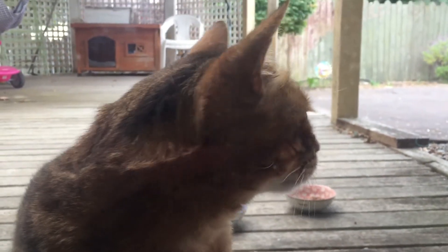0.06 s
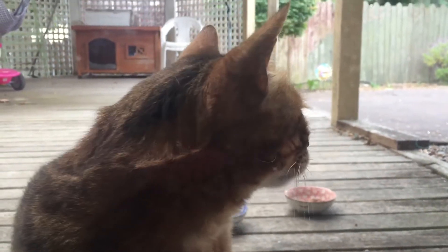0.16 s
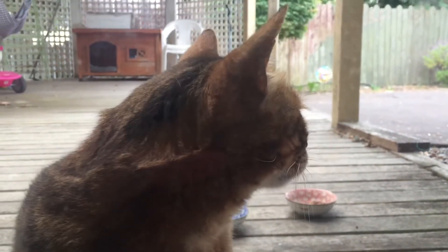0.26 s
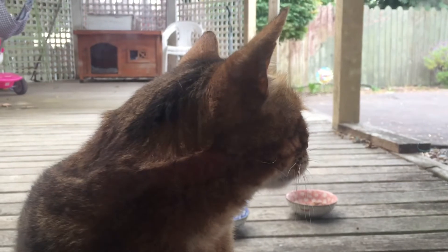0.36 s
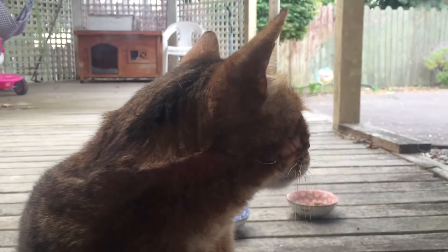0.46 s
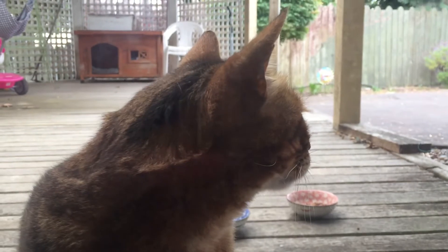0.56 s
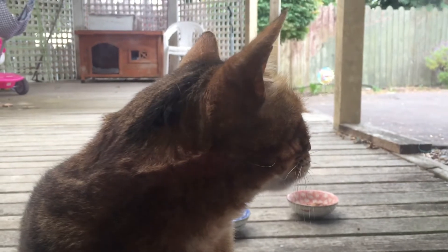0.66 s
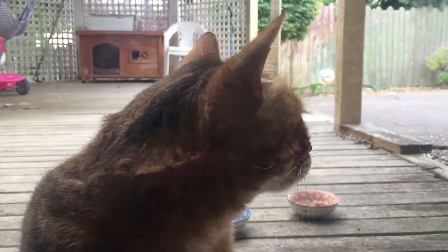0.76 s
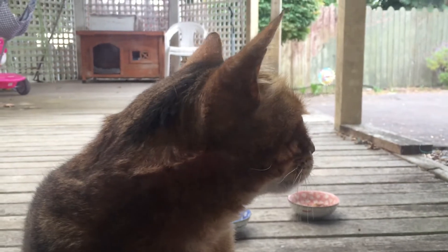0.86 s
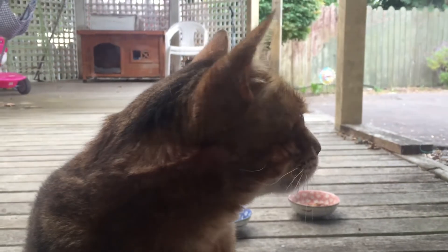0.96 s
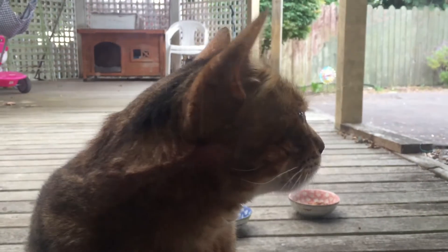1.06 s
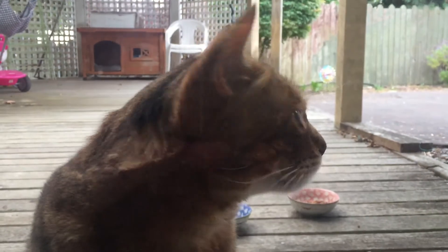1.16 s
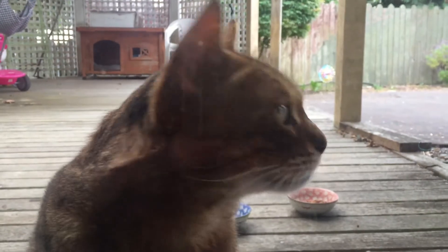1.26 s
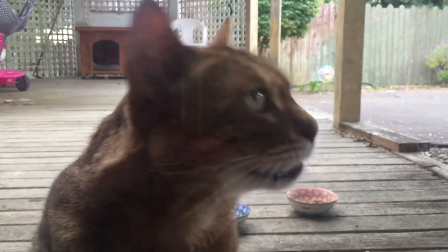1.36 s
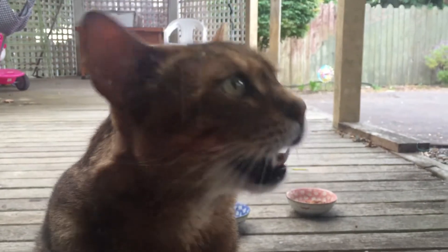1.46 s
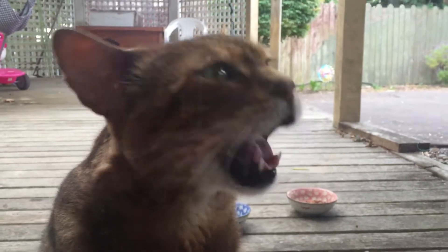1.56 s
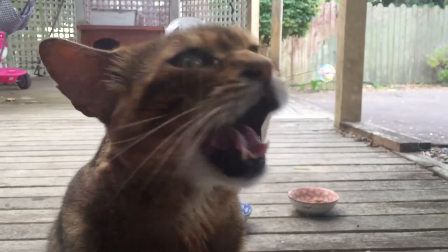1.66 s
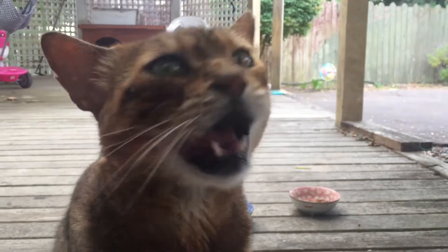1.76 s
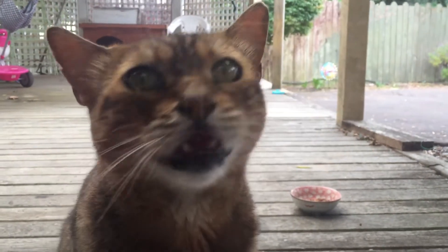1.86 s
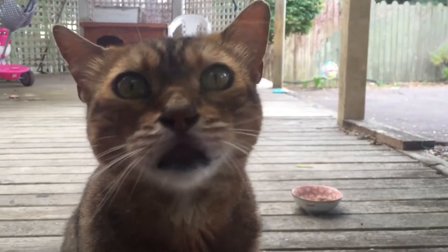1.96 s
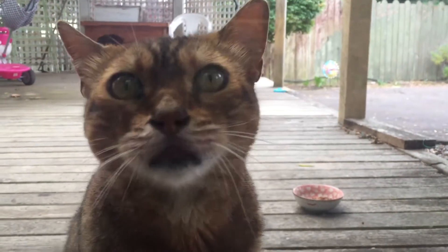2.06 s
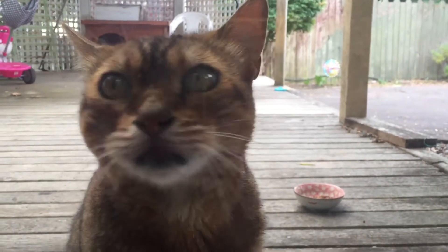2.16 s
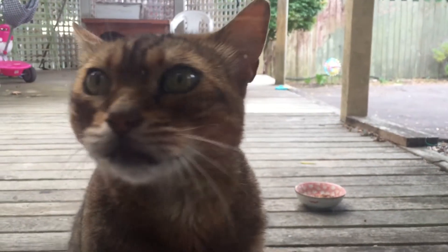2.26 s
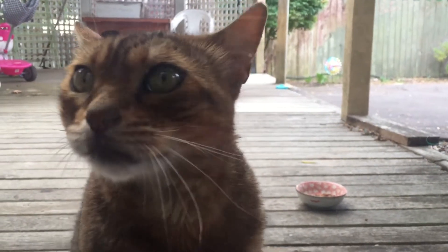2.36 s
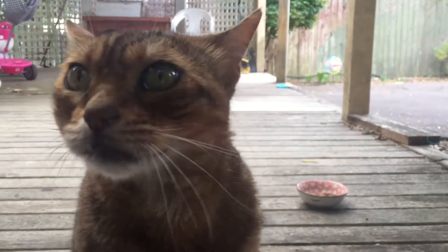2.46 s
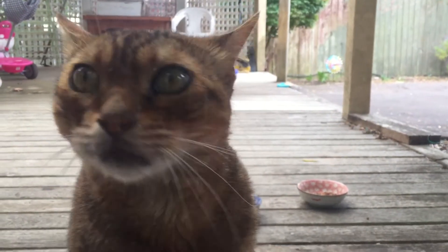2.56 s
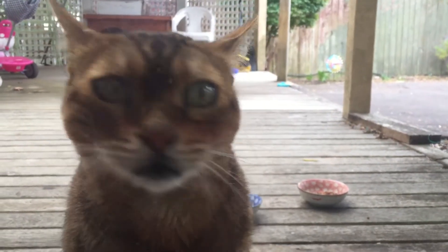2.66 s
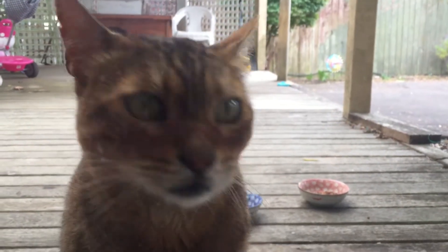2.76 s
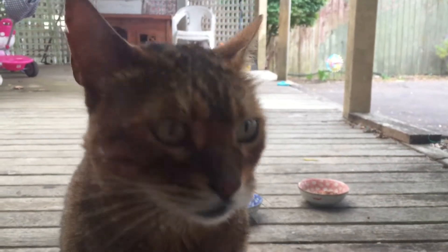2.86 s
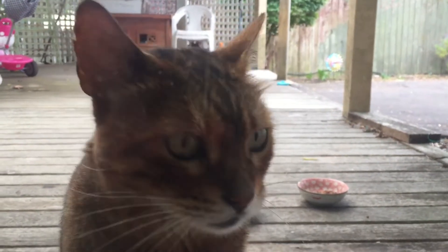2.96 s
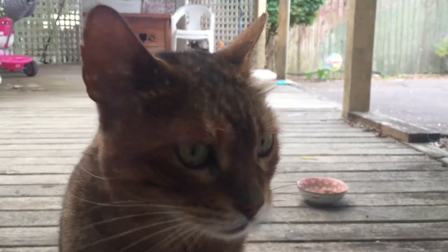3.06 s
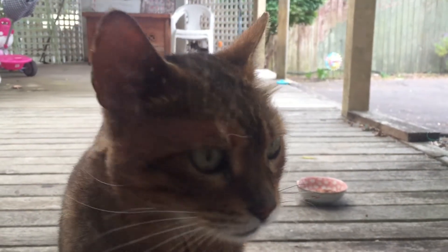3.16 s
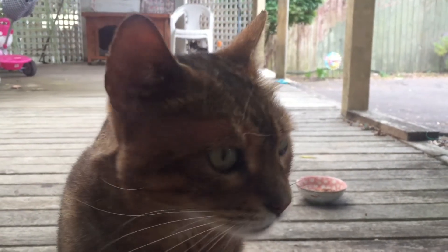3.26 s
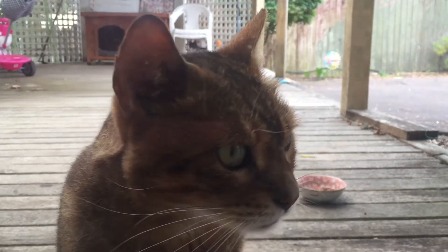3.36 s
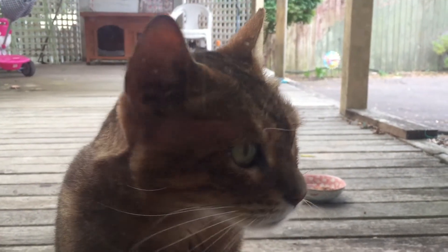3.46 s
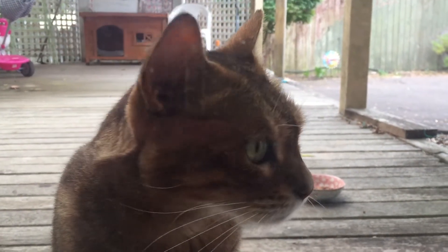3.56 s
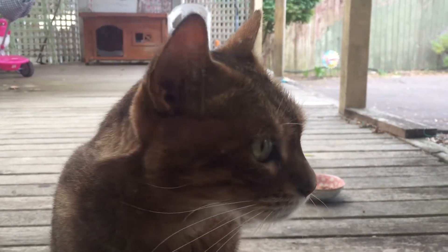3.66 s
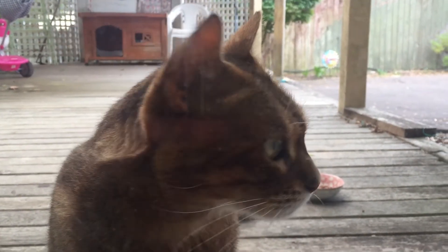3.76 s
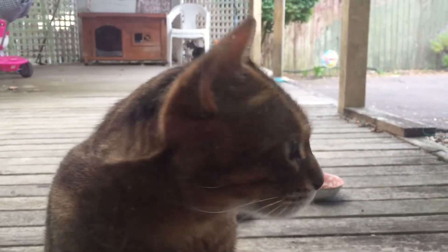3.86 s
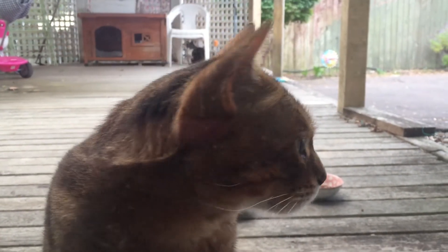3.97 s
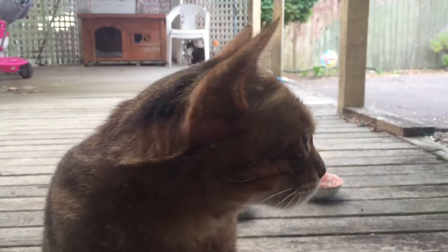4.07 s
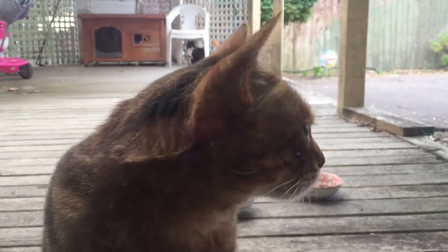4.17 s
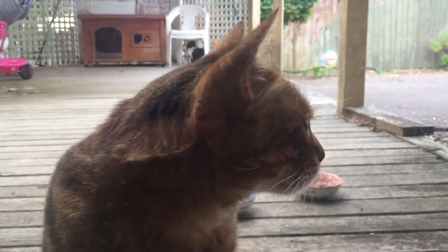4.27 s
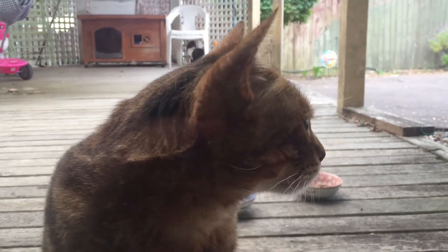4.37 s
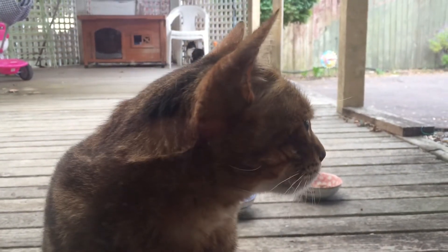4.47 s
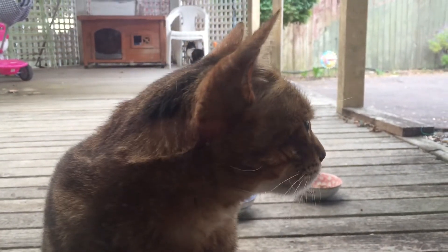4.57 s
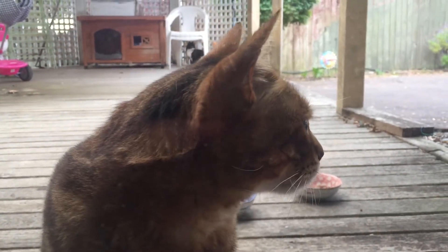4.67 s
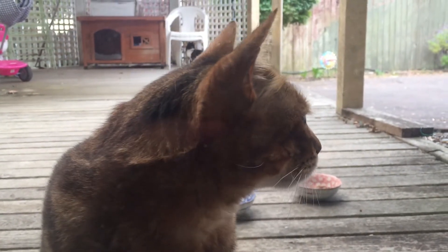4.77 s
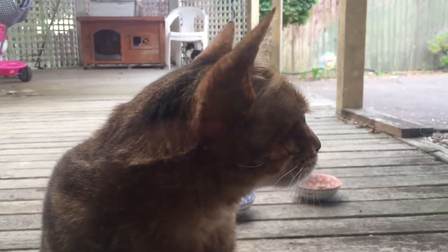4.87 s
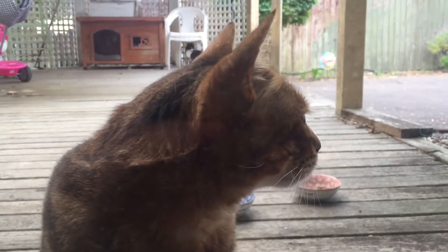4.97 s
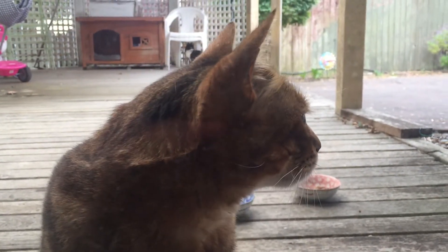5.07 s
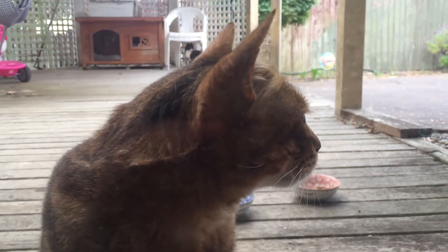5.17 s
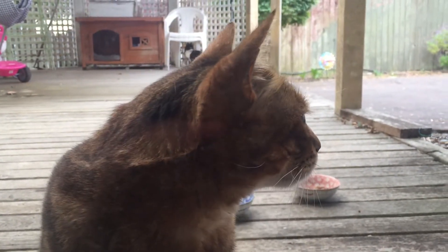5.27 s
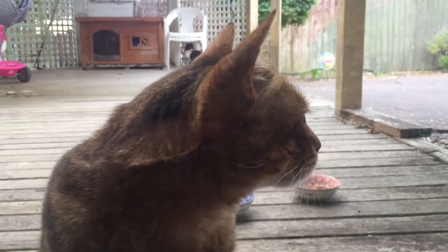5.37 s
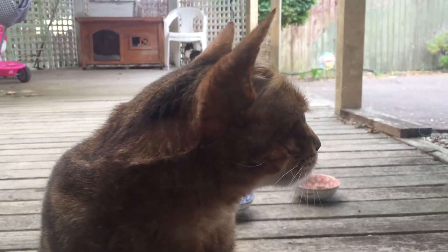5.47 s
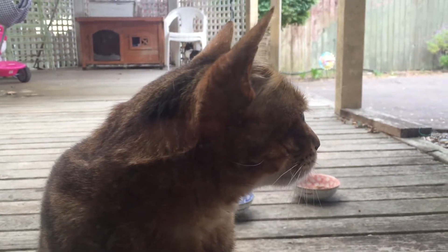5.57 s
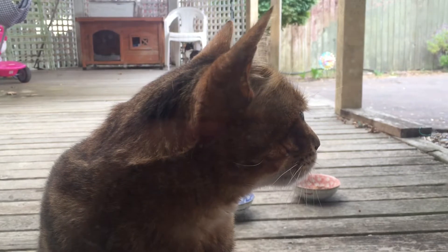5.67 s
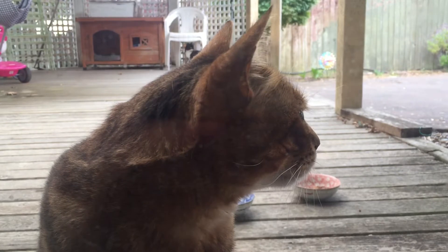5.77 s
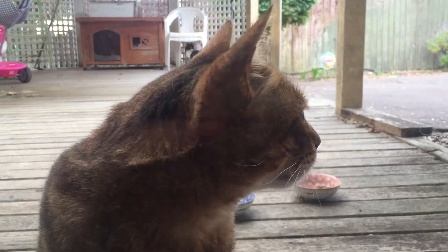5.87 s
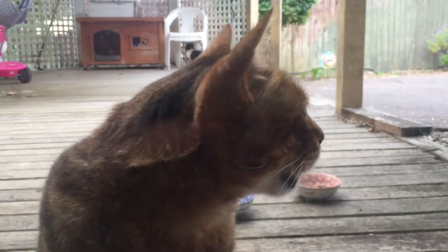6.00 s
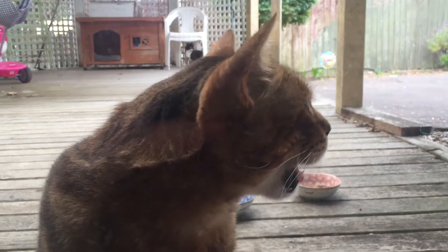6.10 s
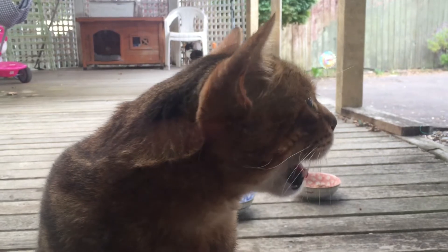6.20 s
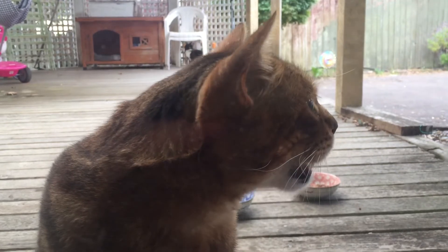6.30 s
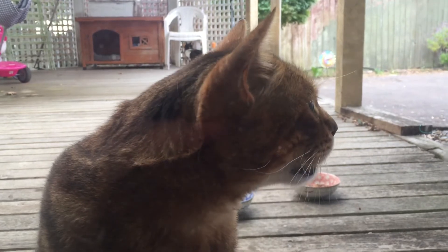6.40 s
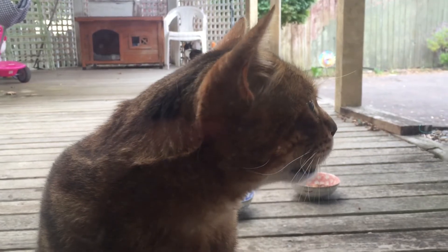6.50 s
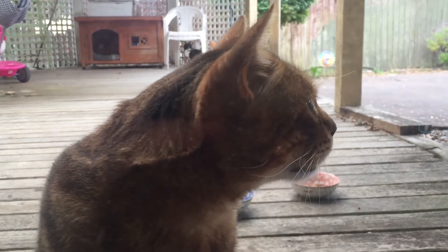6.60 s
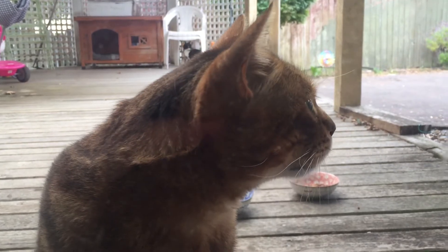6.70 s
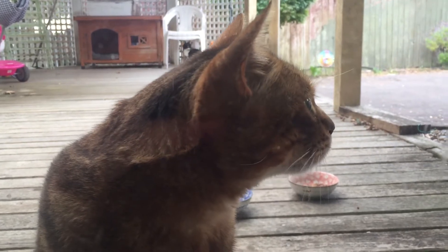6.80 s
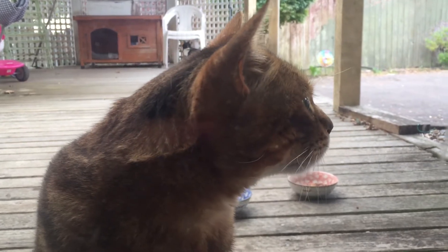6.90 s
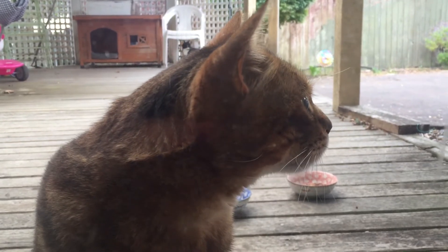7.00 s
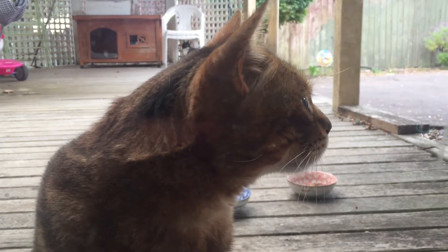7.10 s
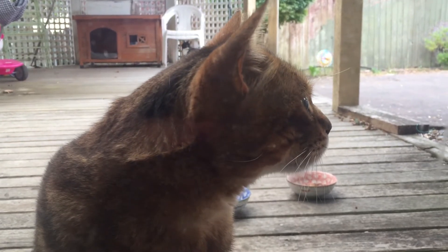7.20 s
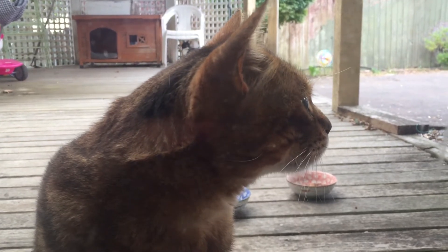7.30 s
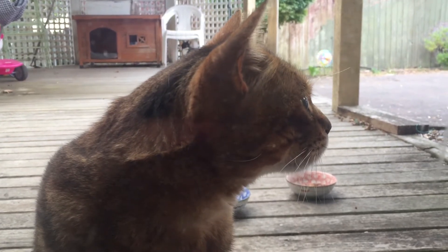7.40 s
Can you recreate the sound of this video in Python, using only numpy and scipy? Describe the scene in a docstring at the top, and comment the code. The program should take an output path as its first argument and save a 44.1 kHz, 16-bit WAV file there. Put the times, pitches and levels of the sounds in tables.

```python
"""Quiet air and microphone hiss lie over a roofed wooden deck. A small tap sounds, then a far engine hums.
A cat meows at 1.5 s: its pitch rises and falls while its mouth opens and closes.
A soft scuff and another tap follow, and the engine swells once more.
Around 4 s a door is knocked twice; its panel booms, shudders and rattles in the frame.
At 6.1 s the cat meows again."""
import sys
import numpy as np
from scipy import signal
from scipy.fft import rfft, irfft, next_fast_len
from scipy.io import wavfile
from scipy.ndimage import uniform_filter1d

SR = 44100
rng = np.random.default_rng(int(sys.argv[2]) if len(sys.argv) > 2 else 0)


def dump(signal):
    """Clip the signal to [-1, 1] and save it as 16-bit WAV at the path in sys.argv[1]."""
    limited = np.clip(np.atleast_2d(signal).T, -1, 1)
    pcm = np.round(limited * 32767).astype(np.int16)
    wavfile.write(sys.argv[1], SR, pcm)


N = 328184
TIME = np.arange(N) / SR


def undb(db):
    """Turn decibels into a gain to multiply by."""
    return 10 ** (np.asarray(db) / 20)


def unit(x):
    """Scale a signal so that its average size (rms) is 1."""
    return x / np.sqrt(np.mean(x ** 2))


def swell(times, db):
    """A gain that follows a curve in decibels and is silent just outside it."""
    edge = np.interp(TIME, [times[0] - .01, times[0], times[-1], times[-1] + .01], [0, 1, 1, 0])
    return edge * undb(np.interp(TIME, times, db))


def envelope(start, length, attack_s, release_s):
    """Fade in smoothly, hold, and fade out."""
    rise = np.clip((TIME - start) / attack_s, 0, 1)
    fall = np.clip((start + length - TIME) / release_s, 0, 1)
    return (np.sin(np.pi / 2 * rise) * np.sin(np.pi / 2 * fall)) ** 2


def wobble(rate):
    """A random drift of size 1 that heads for a new value `rate` times a second."""
    hold = max(int(SR / rate), 1)
    steps = np.repeat(rng.standard_normal(N // hold + 1), hold)
    return unit(uniform_filter1d(steps, hold)[:N])


def colour(x, points):
    """Shape bass and treble along (Hz, dB) points; the result has size 1."""
    hz, db = np.transpose(points)
    size = next_fast_len(N)
    bins = np.maximum(np.fft.rfftfreq(size, 1 / SR), 1)
    gain = undb(np.interp(np.log(bins), np.log(hz), db))
    return unit(irfft(rfft(x, size) * gain, size)[:N])


def ring(x, hz, width):
    """A resonance: let through a band `width` Hz wide around one frequency."""
    return signal.lfilter(*signal.iirpeak(hz, hz / width, fs=SR), x)


def contacts(rate, scatter_db):
    """Tiny impacts of uneven size, about `rate` of them a second."""
    clicks = (rng.random(N) < rate / SR) * rng.standard_normal(N)
    return unit(clicks * undb(scatter_db * rng.standard_normal(N)))


def porch(x, wet_db, t60_s):
    """Boards, wall and roof add short, scattered echoes that fall by 60 dB in t60_s."""
    age = TIME[:SR // 2]
    tail = contacts(rate=2500, scatter_db=4.5)[:len(age)] * undb(-60 * age / t60_s) * (age > .003)
    return x + undb(wet_db) * signal.fftconvolve(x, tail / np.linalg.norm(tail))[:N]


def air():
    """Steady hiss over a low outdoor rumble that wavers."""
    # tone of the background: f/Hz, relative level/dB
    air_colour = [(15, -48), (25, -14), (42, -8.5), (91, 0), (122, -7), (152, -6.5), (253, -15.5),
                  (322, -16), (469, -20.5), (567, -20.5), (848, -22.5), (1450, -24.5), (1570, -23),
                  (6380, -30.5), (15500, -38)]
    bed = colour(rng.standard_normal(N), air_colour)
    rumble = ring(bed, hz=95, width=110)
    waver = undb(1.1 * wobble(6.4)) - 1
    return undb(-66.5) * (bed + rumble * waver)


def engine():
    """Only the firing note of a far engine carries to the deck; it swells, glides and fades."""
    # swells of the hum: start/s, length/s, first firing rate/Hz, last firing rate/Hz, level/dB
    swells = [(.45, 0.42, 135, 136.6, -62), (0.865, 0.58, 143.7, 168.3, -60.5),
              (2.65, 0.47, 139.2, 135.6, -65)]
    out = np.zeros(N)
    for start, length, first_hz, last_hz, db in swells:
        hz = np.interp(TIME, [start, start + length], [first_hz, last_hz])
        note = np.sin(2 * np.pi * np.cumsum(hz) / SR)
        fade_s = 0.32 * length
        out += undb(db) * envelope(start, length, fade_s, fade_s) * note
    return out * undb(2.8 * wobble(37.15))


def taps():
    """Light touches on wood, each a single note that dies away: the wider its band, the sooner."""
    # touches: t/s, level/dB, f/Hz, width/Hz
    touches = [(.254, -56.5, 686, 70), (0.255, -52, 308, 110), (0.275, -55.5, 74.6, 8.9),
               (2.373, -58.5, 205, 22)]
    out = np.zeros(N)
    for start, db, hz, width in touches:
        age = np.maximum(TIME - start, 0)
        out += undb(db) * np.exp(-np.pi * width * age) * np.sin(2 * np.pi * hz * age)
    return out


def scuff():
    """A brief, dull rub made of small slips."""
    # tone of the rub: f/Hz, relative level/dB
    rub_colour = [(29, -32), (50, 5.5), (130, -7), (205, 3), (296, -24), (369, -14), (639, -2.5),
                  (797, -12), (906, 1), (1410, -11), (1630, -4), (2110, -27), (4000, -29), (5200, -61),
                  (8800, -120)]
    rub = undb(-57.5) * envelope(start=2.335, length=.15, attack_s=0.078, release_s=.04)
    return rub * colour(contacts(rate=825, scatter_db=-0.5), rub_colour)


def panel(age):
    """The door panel bends at three low notes at once, which beat against each other."""
    # bending notes: f/Hz, relative level/dB
    notes = [(55, -14.5), (84, 1.5), (113, -10.5)]
    return sum(undb(db) * np.sin(2 * np.pi * hz * age) for hz, db in notes)


def rattle(chatter, frame_hits):
    """The door chatters against its frame, and the hits set the wood ringing."""
    # resonances of door and frame: f/Hz, width/Hz, relative level/dB
    resonances = [(307.5, 13, 8), (726.6, 43, 4), (1025, 44, 0), (1629, 220, 9), (1764, 120, 2),
                  (1960, 130, 0.5), (2198, 29, -10), (2475, 120, -2), (2790, 51, -12), (2990, 190, -9.5),
                  (3270, 99, -10), (4170, 560, -11.5), (5500, 290, -20.5), (6790, 270, -22.5)]
    # tone of the chatter: f/Hz, relative level/dB
    chatter_colour = [(60, -6), (120, -6), (230, 0.5), (480, -3.5), (800, -6), (1200, -0.5), (1600, 1),
                      (2800, -5), (4300, -15), (4950, -18), (5800, -20.5), (7000, -28), (9000, -37.5),
                      (14000, -66)]
    wood = sum(undb(db) * ring(ring(frame_hits, hz, width), hz, width) for hz, width, db in resonances)
    clatter = colour(chatter, chatter_colour)
    return undb(-10.5) * np.std(frame_hits) * unit(wood) + undb(-5) * np.std(chatter) * clatter


def door(rise_s=0.015, boom_decay_s=0.046, shudder_attack_s=0.041, soft_hz=4300):
    """Each knock makes the panel boom, thud and rattle, then shudder to rest."""
    # knocks and rebounds: t/s, rattle/dB, boom/dB, thud/dB, rattle decay/s, ring relative to rattle/dB
    knocks = [(3.887, -37.5, -31.5, -45, 0.052, -2.5), (4.008, -50.5, -61, -56, 0.033, -8),
              (4.092, -51.5, -58, -58, 0.021, 2), (4.407, -30, -21, -48, 0.062, 2)]
    # shudder after each knock: start/s, length/s, boom/dB, rattle/dB
    shudders = [(3.98, 0.39, -44, -49), (4.515, .21, -39.5, -44.5)]
    boom, hard_gain, soft_gain, thud_gain, ring_gain = np.zeros((5, N))
    for start, rattle_db, boom_db, thud_db, decay_s, ring_db in knocks:
        age = np.maximum(TIME - start, 0)
        attack = 1 - np.exp(-(age / .011) ** 2)
        burst = attack * np.exp(-(age / decay_s) ** 2 / 2)
        hard_gain += undb(rattle_db) * burst
        ring_gain += undb(rattle_db + ring_db) * burst
        thud_gain += undb(thud_db) * burst
        age = np.maximum(TIME - start + 0.0077, 0)  # the panel bends before it meets the frame
        push = (1 - np.exp(-(age / rise_s) ** 2)) * np.exp(-(age / boom_decay_s) ** 1.6 / 2)
        boom -= undb(boom_db) * push * panel(age)
    for start, length, boom_db, rattle_db in shudders:
        age = TIME - start
        attack = np.clip(age / shudder_attack_s, 0, 1)
        swing = np.clip(1 - age / length, 0, 1)  # friction runs the swing down in a straight line
        sway = undb(boom_db) * attack * swing ** 0.78
        uneven_age = age + 0.0017 * wobble(25)  # loose contact makes the swings uneven
        boom += sway * panel(uneven_age) * (1 + 0.36 * wobble(45))
        thud_gain += undb(-13.5) * sway
        soft_gain += undb(rattle_db) * attack * swing ** 1.5  # the rattle dies sooner than the boom
    hits = contacts(rate=8100, scatter_db=1.0) * undb(1.58 * wobble(110))
    thud = thud_gain * unit(ring(ring(hits, 140, 140), 140, 140))
    # the later hits are gentler, so they have less treble
    gentle = soft_gain * signal.sosfilt(signal.butter(2, soft_hz, fs=SR, output="sos"), hits)
    rattling = rattle(hard_gain * hits + gentle, ring_gain * hits + gentle)
    return boom + thud + porch(rattling, wet_db=-10.5, t60_s=0.43)


def meow(levels, pitch, loudness, treble, mouth, harmonics=16, settle_s=.11):
    """The vocal folds buzz with harmonics (multiples of the pitch), which throat and mouth shape."""
    throat_db, rasp_db = levels
    times, db = np.transpose(loudness)
    gain = swell(times, db)
    on = gain > 0  # the samples in which the cat calls
    gain = gain[on]
    upper_gain = swell(*np.transpose(treble))[on]
    rasp_gain = undb(rasp_db) * (upper_gain / upper_gain.max()) ** 0.35  # loosely follows the treble
    # the throat sounds evenly, so it carries the quiet ends of the call
    throat_share = 1 / (1 + (gain / undb(throat_db)) ** 2)
    # the voice starts rough, settles, then roughens again as the air runs out
    age = np.maximum(TIME[on] - times[0], 0)
    rough = np.clip(.55 * np.exp(-age / settle_s) + 1.048 * (age / age[-1]) ** 1.91, 0, 1)
    mouth_times, *shape = np.transpose(mouth)
    mouth_hz, mouth_width, upper_hz = (np.interp(TIME[on], mouth_times, column) for column in shape)
    hz = np.interp(TIME[on], *np.transpose(pitch))
    # the folds beat unevenly while the air pressure is low
    hz *= 1 + rough ** 1.5 * (.045 * wobble(170)[on] + .025 * wobble(50)[on])
    order = np.arange(1, harmonics + 1)[:, None]
    harmonic_hz = order * hz

    def resonance(centre, width, steep):
        """Share out power among the harmonics, most to those near the centre; the shares add up to 1."""
        power = (1 + (2 * (harmonic_hz - centre) / width) ** 2) ** -steep
        return power / power.sum(axis=0)

    power = gain ** 2 * (1 - throat_share) * resonance(mouth_hz, mouth_width, steep=2.06)
    power += gain ** 2 * throat_share * resonance(823, 380, steep=7.1)
    power += upper_gain ** 2 * resonance(upper_hz, 950 + 0.81 * mouth_width, steep=7.4)
    power += (rasp_gain * undb(-9)) ** 2 * resonance(5640, 1700, steep=2.4)
    power /= 1 + (610 / harmonic_hz) ** 12  # the open mouth sends out the lowest harmonic poorly
    drift = np.array([wobble(22)[on] - .5 for _ in range(harmonics)])
    flutter = undb((order / 5.5) ** 2 * .8 * drift)  # the high harmonics flutter most
    phase = 2 * np.pi * np.cumsum(hz) / SR
    voice = np.sum(flutter * np.sqrt(2 * power) * np.cos(order * phase), axis=0)
    voice *= 1 + 0.39 * rough * wobble(130)[on]  # weak pressure makes the voice creak
    hiss = unit(ring(ring(rng.standard_normal(N), 5700, 2400), 5700, 2400))[on]
    rasp = undb(-7.0) * rasp_gain * hiss * (1 + np.cos(phase))  # one puff per beat of the folds
    # the lowest harmonic leaves through the nose as the mouth shuts
    nose = undb(-54.5 - 0.015 * mouth_hz) * np.cos(phase) * signal.windows.tukey(len(phase), .15)
    out = np.zeros(N)
    out[on] = voice + rasp + nose
    return out


def cat():
    """Two meows that rise and fall as the mouth opens and closes; each table has one entry per meow."""
    # strength of throat resonance and rasp: throat level/dB, rasp level/dB
    levels = [(-57, -75.5), (-64.5, -78.5)]
    # pitch of the voice: t/s, f/Hz
    pitches = [
        [(1.544, 326.2), (1.666, 429), (1.7, 441.7), (1.76, 457), (1.842, 433.6), (1.914, 411), (2.084, 381.8),
         (2.26, 337.6)],
        [(6.118, 331), (6.135, 401), (6.2, 428.7), (6.28, 440.3), (6.452, 418.2), (6.588, 404.4),
         (6.744, 366.5), (6.8, 305)],
    ]
    # loudness of the voice below the upper resonance: t/s, level/dB
    loudness = [
        [(1.53, -71.5), (1.6, -39), (1.688, -46.5), (1.7, -39.5), (1.778, -48.5), (1.792, -40.5), (1.886, -43),
         (1.908, -48), (1.976, -45), (2.234, -64.5), (2.26, -73)],
        [(6.08, -72.5), (6.168, -44), (6.252, -43), (6.282, -52), (6.334, -41), (6.354, -47), (6.382, -40),
         (6.496, -47), (6.518, -41), (6.784, -65.5), (6.8, -76)],
    ]
    # loudness of the upper resonance: t/s, level/dB
    treble = [
        [(1.61, -69), (1.678, -46), (1.692, -50), (1.706, -43), (1.778, -49), (1.798, -42), (1.818, -48),
         (1.992, -53.5), (2.11, -75.5)],
        [(6.11, -82), (6.126, -67.5), (6.216, -56), (6.304, -50), (6.318, -46.5), (6.396, -58.5), (6.488, -62),
         (6.538, -56), (6.69, -80)],
    ]
    # mouth shape: t/s, mouth resonance/Hz, its width/Hz, upper resonance/Hz
    mouths = [
        [(1.54, 1370, 260, 2750), (1.61, 1560, 280, 2780), (1.68, 1890, 664, 3000), (1.75, 2020, 810, 3440),
         (1.82, 1860, 667, 2870), (1.94, 1760, 830, 2500), (2.015, 1200, 420, 2106), (2.11, 840, 403, 2180),
         (2.26, 674, 350, 2200)],
        [(6.09, 1250, 450, 2630), (6.16, 1606, 280, 3050), (6.29, 1880, 420, 2960), (6.44, 1600, 279, 2820),
         (6.53, 1282, 293.3, 2346), (6.64, 1260, 430, 2330), (6.8, 930, 600, 2166)],
    ]
    return undb(-0.8) * sum(meow(*call) for call in zip(levels, pitches, loudness, treble, mouths))


def scene():
    """All the sounds heard under the porch roof, in one channel."""
    meows = porch(cat(), wet_db=-6, t60_s=0.21)
    small_sounds = porch(scuff() + taps(), wet_db=-1, t60_s=0.24)
    return (meows + small_sounds + door() + engine() + air())[None]


def record(dry):
    """The microphone loses the deepest bass and the recorder cuts the highest treble."""
    bottom_hz, top_hz = 36, 15700
    thin = signal.sosfilt(signal.butter(4, bottom_hz, "high", fs=SR, output="sos"), dry)
    return signal.sosfilt(signal.ellip(10, .2, 70, top_hz, fs=SR, output="sos"), thin)


dry = scene()
out = record(dry)
dump(out)
```